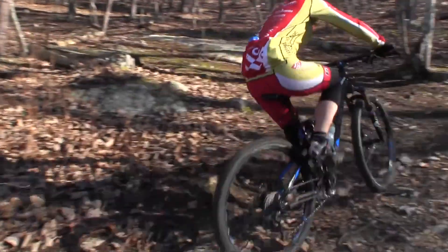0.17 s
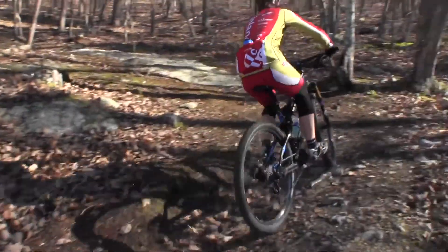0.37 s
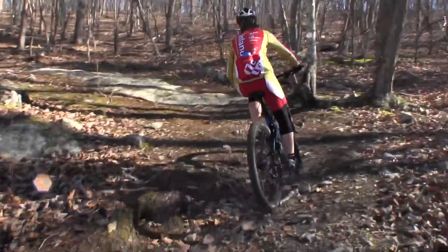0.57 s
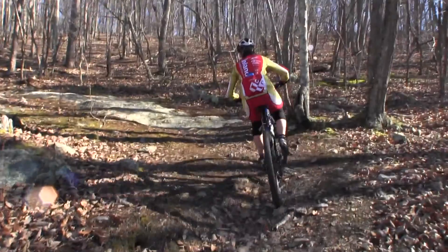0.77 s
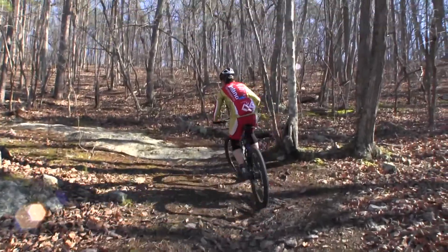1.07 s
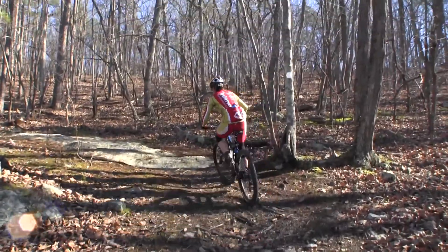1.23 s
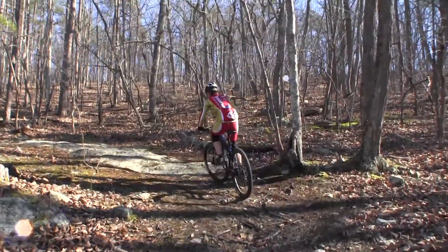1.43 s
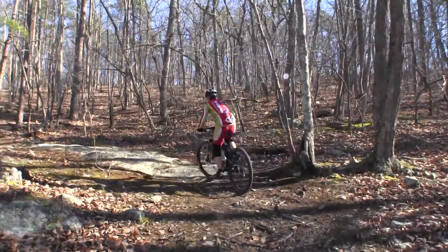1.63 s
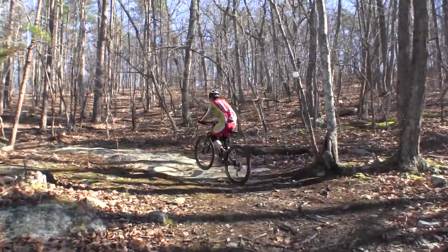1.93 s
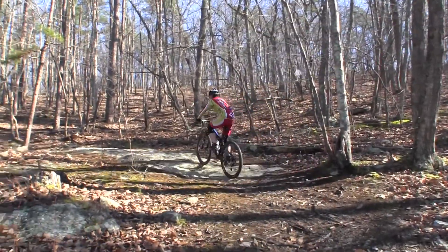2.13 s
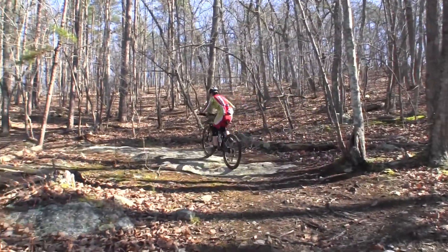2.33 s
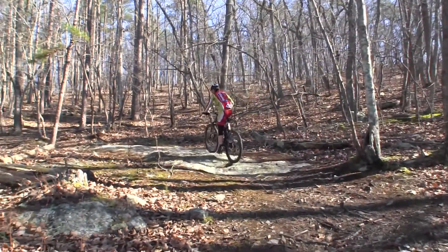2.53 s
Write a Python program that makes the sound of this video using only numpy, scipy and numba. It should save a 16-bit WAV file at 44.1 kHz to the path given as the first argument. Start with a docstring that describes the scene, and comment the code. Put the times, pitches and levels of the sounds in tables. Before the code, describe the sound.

Mountain bike tyres crunch through dry fallen leaves close by, then quickly recede along a woodland trail

```python
"""Mountain bike on a leafy trail

A mountain bike rolls away from a small stereo camera along a woodland trail.
Dry leaves (dense grains over noise) and gritty tread crackle; twigs snap as damped rings with noise tails.
Brittle leaves tick inside bright bursts; rough ground and roots ring the air in the tyre.
Trees scatter it all over a faint low wind, still air and treble hiss."""
import sys
import numpy as np
from scipy import signal
from scipy.fft import rfft, irfft, next_fast_len
from scipy.io import wavfile
from scipy.ndimage import uniform_filter1d
from numba import njit

SR = 44100
rng = np.random.default_rng(int(sys.argv[2]) if len(sys.argv) > 2 else 0)


def amplitude_ratio(level_db):
    """Convert a level in decibels to the matching linear amplitude (field) ratio."""
    exponent = np.asarray(level_db, float) / 20
    return 10 ** exponent


def dump_mix(stems):
    """Bounce the given channels to the path in sys.argv[1] as a 16-bit WAV at rate SR."""
    frames = np.atleast_2d(stems).T  # one column per channel
    limited = np.clip(frames, -1, 1)  # hard clip at full scale
    pcm = np.round(limited * 32767).astype(np.int16)
    wavfile.write(sys.argv[1], SR, pcm)


N = 119070  # samples, 2.7 s


def butter_filter(x, order, hz, kind="low"):
    """Butterworth filter, maximally flat in its pass band."""
    return signal.lfilter(*signal.butter(order, hz, kind, fs=SR), x)


def band_pass(x, low_hz, high_hz, order):
    """Keep one band of frequencies, in second-order sections for stability."""
    sos = signal.butter(order, [low_hz, high_hz], "band", fs=SR, output="sos")
    return signal.sosfilt(sos, x)


def fader(curve):
    """Gain over time from (start_s, level_db) points, in straight dB lines."""
    start_s, level_db = np.array(curve, float).T
    return amplitude_ratio(np.interp(np.arange(N) / SR, start_s, level_db))


def colour(x, table, share=1):
    """Equalise by a share of a (pitch_hz, gain_db) table, read on a log-frequency axis."""
    size = next_fast_len(N + 8192)
    bin_hz = np.arange(size // 2 + 1) * SR / size
    pitch_hz, gain_db = np.array(table, float).T
    gain = np.interp(np.log(np.maximum(bin_hz, 1)), np.log(pitch_hz), gain_db)
    return irfft(rfft(x, size) * amplitude_ratio(share * gain), size)[:N]


def band_level(x, low_hz, high_hz):
    """Scale so that the band low_hz to high_hz has rms 1."""
    return x / np.std(band_pass(x, low_hz, high_hz, 4))


def walk(rate):
    """Random levels held 1 / rate s and slewed twice."""
    hold = int(SR / rate)
    steps = np.repeat(rng.standard_normal(N // 50), hold)[:N + hold]
    return 1.3 * uniform_filter1d(uniform_filter1d(steps, hold), hold)[:N]


@njit
def rings(at, hz, cycles, size, n, sr, rise):
    """Damped rings that swell over rise cycles and fall 20 dB in the given cycles."""
    out = np.zeros(n)
    for k in range(len(at)):
        turn = np.exp((2j * np.pi - 2.3 / cycles[k]) * hz[k] / sr)
        swell = np.exp(-hz[k] / sr / rise)
        ring, unrisen = size[k] + 0j, 1.
        first = int(at[k] * sr)
        last = min(n, int((at[k] + 3 * cycles[k] / hz[k]) * sr))
        for i in range(first, last):
            out[i] += ring.imag * (1 - unrisen)
            ring *= turn
            unrisen *= swell
    return out


def click(s, db, hz, cycles, rise):
    """Rings whose envelope peaks at time s with level db."""
    top = rise * np.log(1 + cycles / (2.3 * rise))  # cycles from start to peak
    height = (1 - np.exp(-top / rise)) * np.exp(-2.3 * top / cycles)
    return rings(s - top / hz, hz, cycles, -amplitude_ratio(db) / height, N, 1. * SR, rise)


def burst(s, db, hz, width, decay_s, noise):
    """A band of noise, hz / width to hz * width, that starts at once and dies away exponentially."""
    out, start = np.zeros(N), int(s * SR)
    fits = min(len(noise), N - start)
    band = band_pass(noise, hz / width, min(hz * width, .45 * SR), 2)
    fade = np.exp(-np.arange(len(band)) / SR / max(decay_s, 1e-4))
    out[start:start + fits] = (amplitude_ratio(db) * band / np.std(band) * fade)[:fits]
    return out


GRAIN_TOP = 0.0066  # share of grains held at the largest size
RECEDE_S = 0.6  # time constant of the change from the near to the far colour


def bed(curve, near, far, grains, low_hz, high_hz):
    """Dense grains of random pitch and size over a smoother rustle, coloured by distance."""
    rate, cycles, spread_db, flicker_db, smooth_db = grains
    when, pitch, rarity, sign = rng.random((int(rate * N / SR), 4)).T
    bottom_hz, top_hz = low_hz / 3, min(3 * high_hz, 17000)
    hz = bottom_hz * (top_hz / bottom_hz) ** pitch
    size = hz * amplitude_ratio(-spread_db * np.log(np.maximum(rarity, GRAIN_TOP))) * np.sign(sign - .5)
    crackle = rings(when * N / SR, hz, np.full(len(hz), 1. * cycles), size, N, 1. * SR, .6)
    rustle = band_level(rng.standard_normal(N), low_hz, high_hz)
    both = band_level(crackle, low_hz, high_hz) + amplitude_ratio(smooth_db) * rustle
    both = both * amplitude_ratio(flicker_db * walk(70))
    close = np.exp(-np.arange(N) / SR / RECEDE_S)
    near_bed = band_level(colour(both, near), low_hz, high_hz)
    far_bed = band_level(colour(both, far), low_hz, high_hz)
    return (close * near_bed + (1 - close) * far_bed) * fader(curve)


# leaves crushed under the tyres, fader on the 4-14 kHz band: start_s, level_db
LEAF_LEVELS = [(0.0, -25), (0.09, -22), (0.15, -26), (0.24, -35.5), (0.32, -33.5), (0.34, -35.5),
               (0.41, -33.5), (0.53, -40.5), (0.61, -38.5), (0.64, -32), (0.69, -41.5), (0.78, -31),
               (0.83, -40), (0.88, -45), (0.99, -43.5), (1.07, -47.5), (1.1, -43.5), (1.14, -50),
               (1.2, -46), (1.24, -50.5), (1.3, -44.5), (1.32, -51), (1.4, -55), (1.48, -58), (1.61, -47.5),
               (1.69, -50), (1.74, -49.5), (1.78, -50), (1.85, -55), (1.92, -56), (2.02, -46),
               (2.07, -48.5), (2.15, -59.5), (2.21, -52.5), (2.35, -56), (2.41, -56.5), (2.58, -59.5),
               (2.62, -56), (2.7, -64.5)]
# tone of the leaves close by, only its shape counts: pitch_hz, gain_db
NEAR_LEAF_TONE = [(500, -29), (1260, 5), (2920, 0.5), (3740, 6), (4600, 2.5), (5240, 1.5), (6620, 3.5),
                  (7150, 4), (11100, 4), (15600, -4)]
# tone of the leaves far off, only its shape counts: pitch_hz, gain_db
FAR_LEAF_TONE = [(1470, -15), (2500, -13), (3190, -2), (4980, -6), (6920, -3), (9050, -13.5), (10000, -6),
                 (11300, -4.5), (15600, -13.5)]
# leaf grains, one row: rate_per_s, ring_cycles, size_spread_db, flicker_db, smooth_share_db
LEAF_CRACKLE = (6996, 3.5, 3.2, 2, -3)


def leaves():
    """Dry leaves crush into thousands of tiny cracks that blur into a rustle."""
    return bed(LEAF_LEVELS, NEAR_LEAF_TONE, FAR_LEAF_TONE, LEAF_CRACKLE, 4000, 14000)


# tread pressing on soil and grit, fader on the 700-2500 Hz band: start_s, level_db
TREAD_LEVELS = [(0.0, -40), (0.04, -34), (0.21, -38), (0.32, -33.5), (0.36, -30.5), (0.44, -41.5),
                (0.65, -37), (0.69, -43.5), (0.76, -34), (0.79, -42.5), (0.83, -32), (0.89, -39.5),
                (1.03, -37.5), (1.07, -48), (1.1, -41), (1.13, -47), (1.22, -40.5), (1.47, -52.5),
                (1.55, -45.5), (1.65, -47), (1.7, -39.5), (1.74, -44), (1.95, -47), (2.01, -43.5),
                (2.06, -47.5), (2.08, -36.5), (2.13, -53), (2.16, -51), (2.2, -43), (2.28, -50),
                (2.36, -45.5), (2.4, -49.5), (2.51, -49), (2.57, -54), (2.62, -45.5), (2.68, -58),
                (2.7, -59)]
# tone of soil and grit at any distance, only its shape counts: pitch_hz, gain_db
SOIL_TONE = [(220, -8.5), (380, -10.5), (482, -3.5), (585, -1), (850, -3), (1180, 3), (1580, -9.5),
             (1900, -3.5), (2790, -9), (3860, -13.5), (5000, -21.5), (6500, -53), (11000, -120)]
# grit grains, one row: rate_per_s, ring_cycles, size_spread_db, flicker_db, smooth_share_db
GRIT_CRUNCH = (2001, 3, 3, 2.5, -4.5)


def tread():
    """Knobs of the tread grind grit into duller, sparser grains."""
    return bed(TREAD_LEVELS, SOIL_TONE, SOIL_TONE, GRIT_CRUNCH, 700, 2500)


TYRE_HZ, TYRE_WIDTH_HZ = 289, 60  # air resonance in the tyre and its bandwidth
# roughness of the ground drumming the tyre's air: start_s, level_db
DRUM_LEVELS = [(0.0, -47), (0.37, -37.5), (0.51, -47.5), (0.62, -45.5), (0.72, -54), (0.8, -37),
               (0.89, -63), (0.91, -37), (1.18, -60), (1.28, -44), (1.42, -46.5), (1.5, -54), (1.68, -49),
               (1.94, -52.5), (2.01, -52), (2.68, -57), (2.7, -53)]


def tyre_drum():
    """Rough ground shakes the tyre's air, whose resonance hums unevenly."""
    shaking = colour(rng.standard_normal(N), [(100, 6), (220, -9.5), (400, -5), (800, -16)])
    shaking = shaking * amplitude_ratio(4.4 * walk(25.16))
    hum = signal.lfilter(*signal.iirpeak(TYRE_HZ, TYRE_HZ / TYRE_WIDTH_HZ, SR), shaking)
    return fader(DRUM_LEVELS) * hum / np.std(hum)


PUFF_DB, PUFF_START_S, PUFF_HZ = -61.5, 0.4, 120  # level once risen, time fully risen, low-pass
# tone of the low wind, only its shape counts in the rumble: pitch_hz, gain_db
WIND_TONE = [(12, -43), (30, -17), (86, -2), (178, -4.5), (220, 2.5), (290, -7), (480, -120)]
# gusts of low wind, before small wavering and left/right trims: start_s, level_db
WIND_GUSTS = [(0.0, -62), (0.98, -48.5), (1.11, -58), (1.8, -52), (2.04, -72), (2.1, -47), (2.17, -57),
              (2.7, -57)]


def wind():
    """Low rumble on both capsules, and rising puffs of air that push them apart in opposite phase."""
    rumble = colour(rng.standard_normal(N), WIND_TONE)
    rumble = rumble / np.std(rumble) * fader(WIND_GUSTS) * amplitude_ratio(0.5 * walk(9.0))
    puffs = colour(rng.standard_normal(N), WIND_TONE) * amplitude_ratio(6.7 * walk(18))
    puffs = butter_filter(puffs, 2, PUFF_HZ)
    still_to_rise = np.clip((PUFF_START_S - np.arange(N) / SR) / .08, 0, 1)
    puffs = puffs / np.std(puffs) * amplitude_ratio(PUFF_DB - 18 * still_to_rise)
    return np.array([1.2 * rumble + puffs, 0.92 * rumble - puffs])


def still_air():
    """The hush of the wood: mid-band noise, partly shared by the capsules."""
    shared, apart = rng.standard_normal(N), rng.standard_normal((2, N))
    return amplitude_ratio(-60) * butter_filter(shared + 1.8 * apart, 1, [300, 3000], "band")


def hiss():
    """The microphone's own treble hiss, equal in both channels."""
    return amplitude_ratio(-71) * butter_filter(rng.standard_normal(N), 2, [5000, 14000], "band")


CRACK_LEAD_S, CRACK_DECAY_S = .0004, 0.0025  # the rustle's head start and its time constant
CRACK_WIDTH, CRACK_CYCLES = 1.56, 2.4  # rustle band ratio, cycles for the tick to fall 20 dB
# brittle leaves cracking, reference level for tick and rustle: start_s, level_db, pitch_hz
LEAF_CRACKS = [(0.014, -1, 8500), (0.0729, 2, 6000), (0.0988, 0.5, 7600), (0.1044, -9, 10500),
               (0.125, -14, 9300), (0.142, -5, 9800), (0.1507, -5, 8600), (0.1586, -8, 8050),
               (0.3093, -11, 7500), (0.4052, -19, 9400), (0.453, -16, 8050), (0.6464, -15.5, 5650),
               (0.7885, -17, 7000), (0.8307, -15, 7450), (0.9765, -21, 6730), (1.0002, -26, 6060),
               (1.083, -29, 7420), (1.086, -24, 8060), (1.1549, -16, 6900), (1.2139, -23, 10350),
               (1.224, -34, 6940), (1.261, -27, 9000), (1.295, -29, 10800), (1.5628, -36.5, 3300),
               (1.609, -29, 4200), (1.6235, -30, 5230), (1.6737, -32, 4200), (1.713, -30, 7000),
               (1.783, -24, 7360), (1.786, -25, 4600), (1.911, -34, 7490), (2.0104, -28, 8900),
               (2.027, -24.5, 7600), (2.048, -31, 8610), (2.0738, -23.5, 9220), (2.1012, -26, 6240),
               (2.221, -22.5, 8010), (2.2546, -24, 9200), (2.4765, -40, 5990), (2.5193, -37, 7100),
               (2.5525, -27.5, 5100)]


def cracks():
    """A brittle tick inside a short bright rustle."""
    s, db, hz = np.array(LEAF_CRACKS, float).T
    ticks = click(s, db - 5.5, hz, np.full(len(s), CRACK_CYCLES), 1.0)
    noise = rng.standard_normal((len(s), 2000))
    rustles = sum(burst(t - CRACK_LEAD_S, d - 12, f, CRACK_WIDTH, CRACK_DECAY_S, z)
                  for t, d, f, z in zip(s, db, hz, noise))
    return ticks + rustles


SNAP_RISE_CYCLES, SNAP_RING = 1, 0.85  # swell of the ring, scale on the table's cycles
SNAP_CRUMBLE_DB, SNAP_CRUMBLE_S = -17, 0.004  # tail relative to the snap, its time constant
SNAP_LOW_HZ = 390  # high-pass on the rings
# twigs and stones snapping, peak before the high-pass, cycles before scaling:
# start_s, peak_db, pitch_hz, ring_cycles
TWIG_SNAPS = [(0.0741, -16, 3500, 4.7), (0.1585, -15, 2230, 1.7), (0.1749, -16, 2330, 0.52),
              (0.255, -22, 2660, 0.69), (0.2954, -5.5, 2150, 0.77), (0.3403, -14, 1330, 3.1),
              (0.3497, -21.5, 1260, 3), (0.4006, -11, 1230, 3.2), (0.4044, -8.5, 1870, 0.41),
              (0.4079, -21, 1700, 1.6), (0.4649, -10, 1890, 0.84), (0.469, -15, 2040, 0.44),
              (0.5636, -20, 2170, 0.4), (0.5794, -20, 1380, 2.2), (0.5986, -26, 1670, 0.82),
              (0.6431, -14.5, 2470, 0.54), (0.6482, -20, 2360, 0.79), (0.7225, -22.5, 1090, 2.8),
              (0.9763, -13.5, 1400, 2.2), (1.0828, -14.5, 1030, 0.64), (1.157, -16, 2420, 1.03),
              (1.216, -13.5, 2200, 0.36), (1.224, -16.5, 2430, 1.3), (1.261, -27, 980, 5.2),
              (1.5256, -39, 1170, 4.9), (1.5474, -31, 2380, 2), (1.5912, -43, 1410, 2.4),
              (1.6599, -24.5, 2880, 2.3), (1.6854, -26, 1170, 3.7), (1.7079, -11, 2060, 2.5),
              (1.9107, -27, 1410, 0.6), (1.9626, -29.5, 1420, 0.97), (2.0694, -27, 1080, 2.7),
              (2.0892, -26, 1240, 1.4), (2.1922, -31, 1340, 1.1), (2.2202, -35, 2340, 1.4),
              (2.2553, -30, 3100, 3.2), (2.2898, -33, 1730, 4.9), (2.3721, -31.5, 1180, 7.7),
              (2.476, -25, 1700, 0.68), (2.5117, -34.5, 1040, 1.6), (2.5198, -33, 1680, 1.4),
              (2.5533, -34, 3420, 1.1), (2.6191, -36.5, 890, 11.5)]


def snaps():
    """A short woody ring and a crumbling tail."""
    s, db, hz, cycles = np.array(TWIG_SNAPS, float).T
    ring = click(s, db, hz, SNAP_RING * np.maximum(cycles, .5), SNAP_RISE_CYCLES)
    ring = butter_filter(ring, 2, SNAP_LOW_HZ, "high")
    noise = rng.standard_normal((len(s), 3000))
    crumble = sum(burst(t, d + SNAP_CRUMBLE_DB, f, 1.8, SNAP_CRUMBLE_S, z)
                  for t, d, f, z in zip(s, db, hz, noise))
    return ring + crumble


BUMP_CYCLES, BUMP_PUSH_S = 5.5, 0.003  # cycles to fall 20 dB, length of the soft push
# tyre bumping over roots, drive level before swell and push: start_s, level_db, pitch_hz
ROOT_BUMPS = [(0.132, -30, 313), (0.343, -21.5, 281), (0.597, -30, 289), (0.643, -30.5, 237),
              (0.763, -25.5, 276), (0.836, -28, 313), (0.917, -27, 300), (1.016, -28.5, 304),
              (1.259, -30, 292), (1.808, -32, 287), (2.004, -33.5, 314), (2.07, -31.5, 300),
              (2.179, -31.5, 293)]


def bumps():
    """Soft pushes ring the air inside the tyre."""
    s, db, hz = np.array(ROOT_BUMPS, float).T
    ring = rings(s, hz, np.full(len(s), BUMP_CYCLES), amplitude_ratio(db), N, 1. * SR, 0.94)
    push = np.hanning(int(BUMP_PUSH_S * SR))
    return np.convolve(ring, 2 * push / push.sum())[:N]


TREES_T60_S, TREES_DB, TREES_HZ = 0.44, -21, 3000  # 60 dB decay time, tail gain, low-pass


def trees(bike):
    """Trunks scatter the sound into a dull decaying tail, added to the direct sound."""
    t = np.arange(9000) / SR
    tail = butter_filter(rng.standard_normal(len(t)), 1, TREES_HZ)
    tail = tail * amplitude_ratio(-60 * t / TREES_T60_S) * (t > .004)
    scattered = signal.fftconvolve(bike, tail / np.linalg.norm(tail))[:N]
    return bike + amplitude_ratio(TREES_DB) * scattered


SCATTER_PER_S = 120  # how fast the crackle jumps between left and right
# left minus right: pitch_hz, difference_db
CAPSULE_BALANCE = [(60, -16), (110, 4), (200, -1), (380, 2), (700, 0.5), (1290, -0.5), (2380, -1.5),
                   (4400, 0), (8120, -2), (15000, -2)]
# gain on the jumping part that parts the two capsules: pitch_hz, gain_db
CAPSULE_SPREAD = [(100, -10), (300, -14.5), (1000, -16.5), (2500, -30), (5000, -15), (12000, -21.5)]


def capsules(mid):
    """Two capsules hear different tone, and crackle that jumps between them."""
    side = colour(mid * walk(SCATTER_PER_S), CAPSULE_SPREAD)
    left = colour(mid, CAPSULE_BALANCE, .5)
    right = colour(mid, CAPSULE_BALANCE, -.5)
    return np.array([left + side, right - side])


def scene():
    """The bike through air and trees onto two capsules, over wind, still air and hiss."""
    bike = leaves() + tread() + tyre_drum() + cracks() + snaps() + bumps()
    bike = butter_filter(bike, 2, 12130)  # treble limit of the bike
    return capsules(trees(bike)) + wind() + still_air() + hiss()


def top_cut(x):
    """Nothing passes above the cut-off."""
    return signal.sosfilt(signal.butter(12, 15740, fs=SR, output="sos"), x)


def record(dry):
    """The finished mix as the camera keeps it."""
    return top_cut(dry)


dry = scene()
out = record(dry)
dump_mix(out)
```